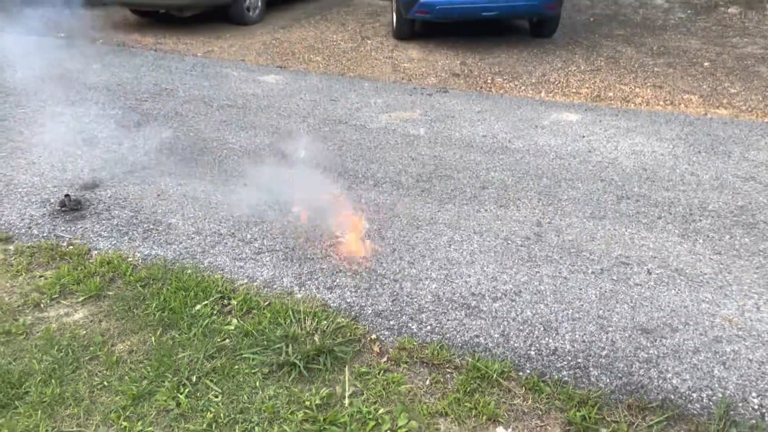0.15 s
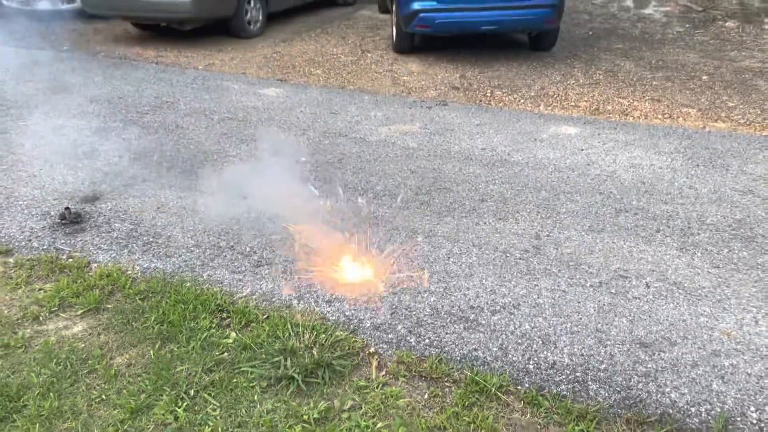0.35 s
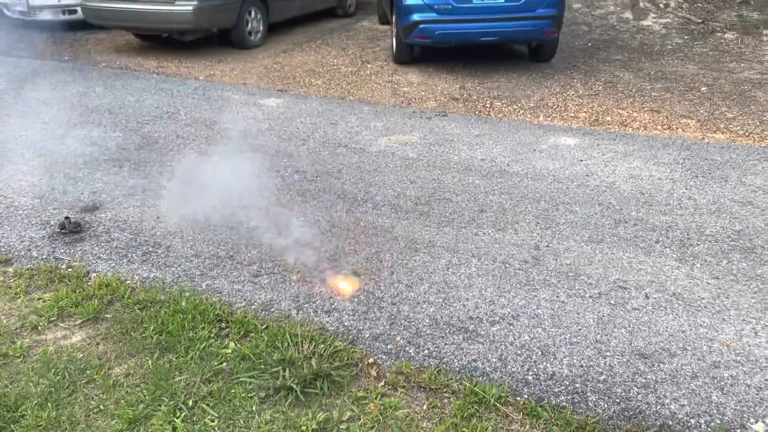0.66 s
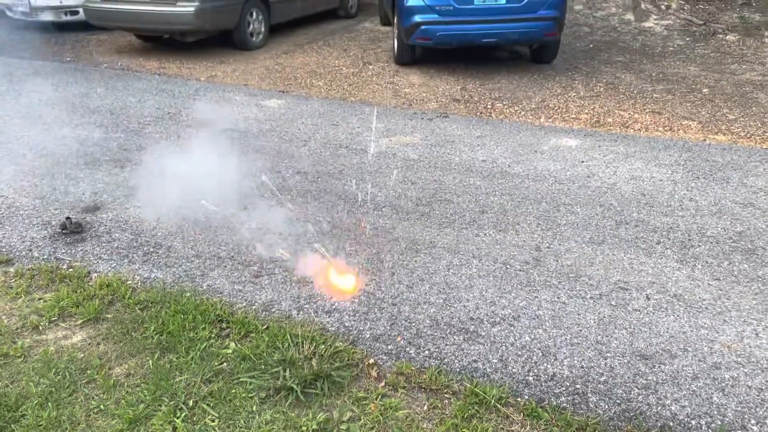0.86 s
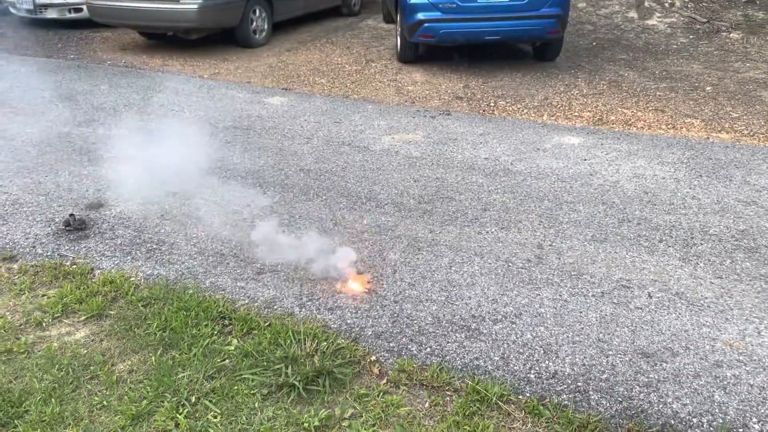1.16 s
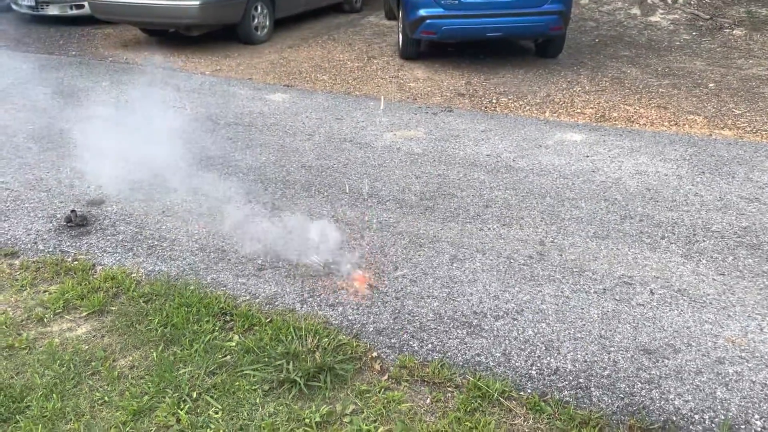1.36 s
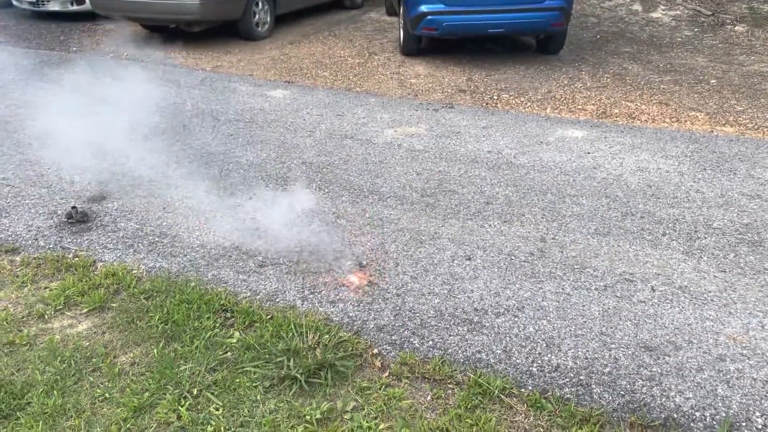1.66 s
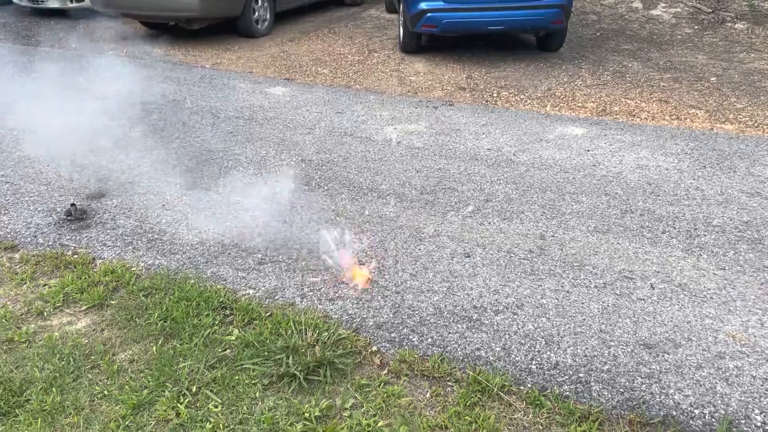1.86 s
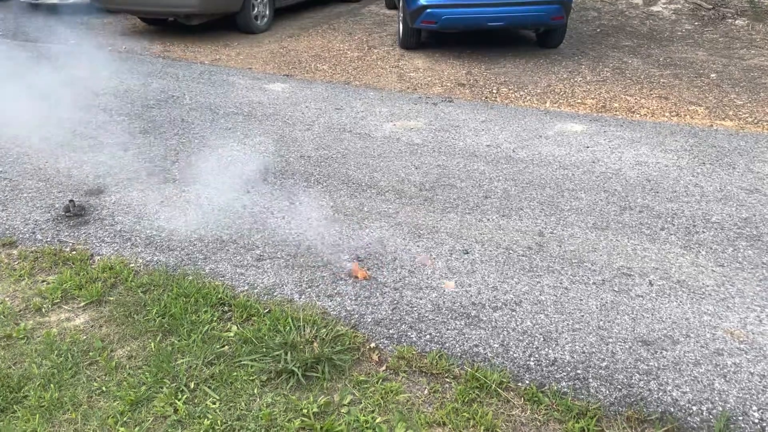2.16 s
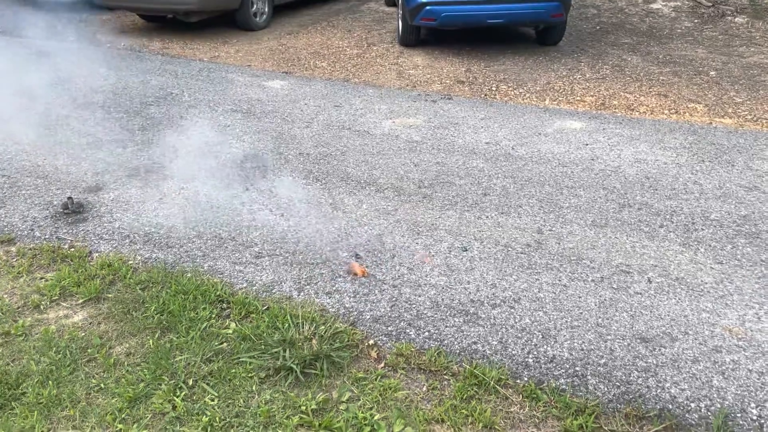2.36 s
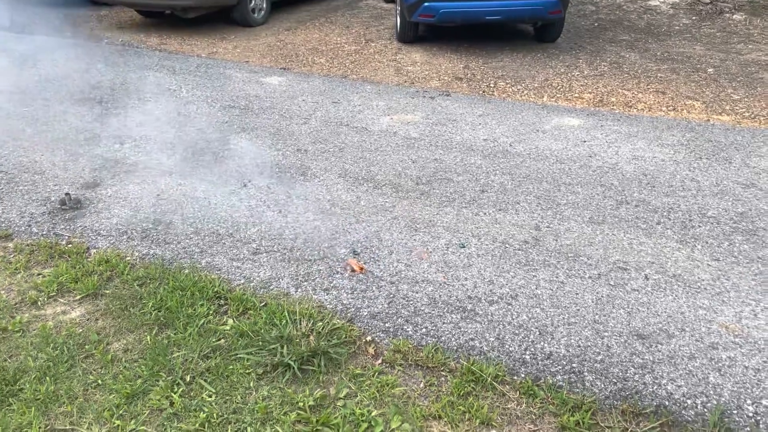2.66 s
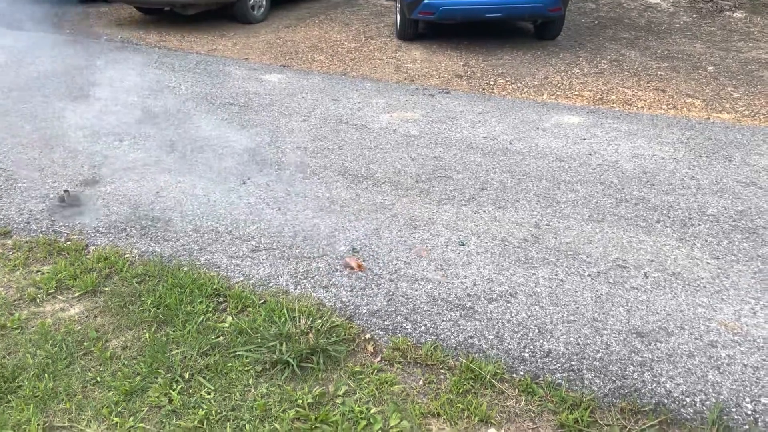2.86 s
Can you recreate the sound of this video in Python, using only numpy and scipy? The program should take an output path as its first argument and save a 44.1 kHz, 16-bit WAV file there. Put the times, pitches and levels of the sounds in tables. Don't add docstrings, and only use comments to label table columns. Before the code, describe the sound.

A small ground firework crackles a few metres away: dense, irregular sharp pops from 0.1 to 0.8 seconds, with gaps around 0.45 and 0.65. Single cracks and pairs follow until 1.9, each with hiss, thump, quick echoes and a soft tree tail. Quiet outdoor wash and faint distant machine hum remain; the hum drops near 2.8, and one last dry pop snaps at 2.9.

```python
import sys
import numpy as np
from scipy import signal
from scipy.fft import rfft, irfft
from scipy.io import wavfile

SR = 44100
rng = np.random.default_rng(int(sys.argv[2]) if len(sys.argv) > 2 else 0)


def elevation(decibels):
    levels = np.asarray(decibels, float)
    return 10 ** (levels / 20)


def generate_wav(signal):
    frames = np.transpose(np.atleast_2d(signal))
    scaled = np.clip(frames, -1, 1) * 32767
    pcm = np.round(scaled).astype(np.int16)
    wavfile.write(sys.argv[1], SR, pcm)


N = 132300
PAD = 8192
LENGTH = N + 2 * PAD
POP_SIZE = 4096

# frequency in Hz, level in dB.
CRACK_TONE = [(150, -20.5), (1000, -9), (2200, -4), (4300, -4), (5600, -7.5), (8500, 0), (12500, -10),
              (15500, -15.5)]
# frequency in Hz, level in dB.
THUMP_TONE = [(25, -4.5), (60, 7), (120, 2.5), (300, -1.5), (520, -4), (750, -12.5), (1200, -42.5),
              (3000, -86)]
ECHO_DELAYS = [.0245, .0435, .0548, .016]


def evened(x):
    return x / np.sqrt(np.mean(x ** 2) + 1e-20)


def read(points, hz):
    f, value = np.transpose(points)
    return np.interp(np.log(hz + 1), np.log(f + 1), value)


def colour(x, table):
    length = x.shape[-1]
    hz = np.fft.rfftfreq(length, 1 / SR)
    return irfft(rfft(x) * elevation(read(table, hz)), length)


def diffuse(length):
    # frequency in Hz, likeness of the two ports from 0 to 1.
    likeness = [(60, .8), (400, .55), (2000, .6), (6000, .8), (8000, .996), (16000, .994)]
    a, b = rfft(rng.standard_normal((2, length)))
    same = np.clip(read(likeness, np.fft.rfftfreq(length, 1 / SR)), 0, 1)
    return irfft(np.array([a, same * a + np.sqrt(1 - same ** 2) * b]), length)


def wander(lowest_hz):
    t = (np.arange(LENGTH) - PAD) / SR
    rates = np.geomspace(lowest_hz, 12 * lowest_hz, 20)
    return evened(sum(np.sin(2 * np.pi * (f * t + rng.random())) / np.sqrt(f) for f in rates))


def outdoor_wash():
    # frequency in Hz, level in dB per Hz.
    air_tone = [(25, -17), (60, -10), (110, -13), (330, -13.5), (1000, -25), (3000, -25.5), (3400, -34),
                (16500, -42)]
    level_db = -65.5 + 1.2 * wander(0.5)
    return elevation(level_db) * evened(colour(diffuse(LENGTH), air_tone))


def machine_hum():
    # frequency in Hz, level in dB.
    partials = [(107.7, -68.5), (215.3, -85), (328.4, -79.5)]
    off_s, fade_s = 2.78, 0.021
    t = (np.arange(LENGTH) - PAD) / SR
    flutter = wander(3)
    turns = np.cumsum(1 + 0.015 * flutter) / SR
    running = 0.11 + 1.9 / (1 + np.exp((t - off_s) / fade_s))
    return running * sum(elevation(db + 0.73 * flutter) * np.sin(2 * np.pi * hz * turns) for hz, db in partials)


def far_wall_boom():
    delay_s, smear_s = 0.14, 0.045
    t = np.arange(SR) / SR
    boom = diffuse(SR) * np.exp(-((t - delay_s) / smear_s) ** 2)
    return boom / np.linalg.norm(boom[0])


def tree_tail():
    # frequency in Hz, time to fall 60 dB in seconds.
    decay = [(50, 0.57), (200, 0.6), (700, 0.33), (2000, 0.96), (5000, 0.84), (10000, 0.63), (15000, 0.78)]
    open_share = 0.3
    hz, frames, z = signal.stft(diffuse(SR), SR, nperseg=512)
    fall = elevation(-60 * frames / read(decay, hz)[:, None])
    tail = signal.istft(z * fall, SR, nperseg=512)[1][:, :SR]
    first = ECHO_DELAYS[0]
    tail *= np.interp(np.arange(SR) / SR, [0, first / 2, first, 2 * first], [0, open_share, open_share, 1])
    return tail / np.linalg.norm(tail[0])


def near_echoes():
    # level in dB, brightness in Hz.
    reflectors = [
        (-4, 5000),
        (-17, 9000),
        (-12, 12000),
        (-19, 9000),
    ]
    smears = [.0025, .002, .0003, .001]
    t = np.arange(SR) / SR
    near = np.zeros((2, SR))
    for delay, smear, (db, top_hz) in zip(ECHO_DELAYS, smears, reflectors):
        puff = diffuse(SR) * (t >= delay) * np.exp(-abs(t - delay) / smear)
        puff = colour(puff, [(top_hz / 8, -14), (top_hz / 2, 0), (top_hz, 0), (top_hz * 2, -12)])
        near += elevation(db) * puff / np.linalg.norm(puff[0])
    return near


def thrown_back(blasts, thumps, dips):
    # frequency in Hz, level in dB.
    tail_tone = [(40, 9), (600, 0), (2000, -1), (5500, -0.5), (8500, 0.5), (11500, -7), (13000, -14),
                 (16000, -14.5)]
    # frequency in Hz, level in dB.
    early_tone = [(60, 4.5), (300, 7.5), (1200, -5.5), (2500, -10.5), (6000, -20), (10000, -15.5),
                  (16000, -33)]
    # frequency in Hz, level in dB.
    boom_tone = [(25, -10), (55, 0), (80, -10), (130, -40)]
    # frequency in Hz, level in dB.
    port_tone = [(11600, 0), (12400, -9), (13500, -9), (14200, 0), (15800, 0), (16300, -25)]
    early_s, early_db = -0.07, -9.5
    early = np.zeros(LENGTH)
    early[PAD + round(early_s * SR)] = 10 * elevation(early_db)

    into_tail = elevation(-8.5) * colour(blasts, tail_tone)
    into_tail += elevation(-5) * colour(thumps, THUMP_TONE)
    into_tail += colour(early, early_tone)
    into_boom = elevation(-3) * colour(thumps, boom_tone)
    back = signal.fftconvolve(colour(blasts, CRACK_TONE)[None], near_echoes(), axes=1)
    back += signal.fftconvolve(into_tail[None], tree_tail(), axes=1)
    back += signal.fftconvolve(into_boom[None], far_wall_boom(), axes=1)

    recover_s = 0.05
    dip_db = signal.lfilter([1], [1, -np.exp(-1 / (recover_s * SR))], dips)
    return colour(back[:, :LENGTH], port_tone) / elevation(np.minimum(dip_db, 25))


def pop(crack_db, blast_db, thump_db):
    # frequency in Hz, level in dB.
    debris_tone = [(300, -14), (800, -14.5), (1250, -0.5), (1600, -13.5), (2200, -1), (5500, -13),
                   (8500, -12.5), (14000, -31)]
    # frequency in Hz, level in dB.
    ahead_tone = [(1500, -6), (6000, -7), (8000, -5.5), (9000, -39.5)]
    bounce_delays = [.0005, .0011, .0023]
    bounce_levels = [-14.5, -19.5, -17.5]
    t = (np.arange(POP_SIZE) - POP_SIZE // 2) / SR
    spike = 1.0 * (t == 0)
    thump = colour(spike, THUMP_TONE)
    direct = colour(spike, CRACK_TONE)
    crack = direct.copy()
    stretch = 1 + rng.random() / 5
    for s, db in zip(bounce_delays, bounce_levels):
        crack += elevation(db) * np.roll(direct, round(s * stretch * SR))

    grow = elevation(np.clip(0.012 * 19.4 * (blast_db + 33), -12, 12))
    rise_s, burst_s = 0.0011 * grow, 0.0023 * grow
    shape = np.where(t < 0, np.exp(-abs(t) / rise_s), np.exp(-(t / burst_s) ** 2))
    common = colour(rng.standard_normal(POP_SIZE), debris_tone)
    apart = colour(rng.standard_normal((2, POP_SIZE)), debris_tone[:4] + [(6000, -33)])
    hiss = evened(common + apart)
    dull = colour(hiss, ahead_tone)
    skirt = elevation(-20) * np.exp(-abs(t) / 0.0045) * evened(dull)
    debris = shape * np.where(t < 0, dull, hiss) + skirt

    ring_hz, ring_s = 1265, 0.0014 * grow
    swell = np.exp(-abs(t) / (ring_s * np.where(t < 0, 1, 0.4)))
    swing = swell * np.cos(2 * np.pi * (ring_hz * t + rng.random((2, 1))))
    swing_db = 3.83 * (blast_db + 16) - 17.5 - 2

    out = elevation(crack_db + 9) * crack / crack.max()
    out = out + elevation(blast_db + 0.5) * debris
    out += elevation(swing_db) * swing
    return out + elevation(thump_db + 7) * thump / thump.max()


def firework():
    # start in seconds, crack in dB, blast in dB, thump in dB.
    dense = [(.0040, -30, -69, -47), (0.1248, -8.5, -14.5, -16.5), (0.1492, -17, -12.5, -39),
             (0.1513, -13.5, -17.5, -7), (0.178, -27, -51, -71), (0.1962, -16.5, -27.5, -60),
             (0.2526, -10, -30.5, -41.5), (0.282, -24, -80, -54), (0.2921, -10.5, -21, -18),
             (0.3152, -6.5, -27.5, -31.5), (0.3322, -8.5, -54, -38), (.3415, -22, -32.5, -49.5),
             (0.3456, -15, -31, -49), (.3760, -4.5, -23.5, -53), (.3790, -10, -31, -41),
             (0.5136, -10.5, -15, -19), (0.5572, -8.5, -23.5, -39), (0.5783, -8, -20.5, -23),
             (0.5919, -8, -20.5, -25.5), (0.6088, -7.5, -28, -52), (0.6169, -8.5, -22.5, -34),
             (0.711, -8, -32, -40.5), (0.726, -9, -26.5, -47), (0.7853, -32.5, -35.5, -46.5)]
    # start in seconds, crack in dB, blast in dB, thump in dB.
    sparse = [(0.8586, -7, -18.5, -18), (0.9619, -4, -20, -46), (1.0218, -8, -30.5, -57),
              (1.0709, -6.5, -18, -29), (1.214, -6.5, -22.5, -44.5), (1.3066, -5.5, -17, -25),
              (1.321, -8.5, -16.5, -20.5), (1.3605, -4.5, -25, -31), (1.4167, -29, -55, -68),
              (1.4194, -19.5, -31.5, -39.5), (1.441, -72, -54, -41.5), (1.5816, -40.5, -50, -50.5),
              (1.6989, -6.5, -16.5, -18), (1.8540, -7, -28, -45), (1.8561, -3, -21.5, -35.5),
              (1.8988, -21.5, -36.5, -53.5), (2.907, -9, -32, -72)]
    echo_cap_db = -17
    dip_per_db, dip_from_db = 1.2, -18
    direct = np.zeros((2, LENGTH))
    blasts, thumps, dips = np.zeros((3, LENGTH))
    for s, crack_db, blast_db, thump_db in dense + sparse:
        at = PAD + round(s * SR)
        direct[:, at - POP_SIZE // 2:at + POP_SIZE // 2] += pop(crack_db, blast_db, thump_db)
        blasts[at] = 10 * elevation(min(blast_db, echo_cap_db))
        thumps[at] = 10 * elevation(thump_db)
        dips[at] = dip_per_db * max(blast_db - dip_from_db, 0)
    return direct + thrown_back(blasts, thumps, dips)


def scene():
    # frequency in Hz, level in dB.
    casing = [(900, 1), (1300, -1), (1500, -1), (2300, 1.5), (3100, -7.5), (4400, 1.5), (5500, -2.5),
              (7000, 3)]
    # frequency in Hz, delay in seconds.
    bass_lag = [(30, .026), (60, .017), (100, .011), (200, .0055), (400, .0035), (800, 0.0013),
                (2000, 0.00027), (5000, 0.0012)]
    # frequency in Hz, radians by which the left port leads.
    port_phase = [(0, -.7), (520, -1.5), (1200, 0), (1460, 2.1), (2600, .6), (5800, 2.0), (7150, 1.2),
                  (17000, 15.3)]
    mix = firework() + outdoor_wash() + machine_hum()
    hz = np.fft.rfftfreq(LENGTH, 1 / SR)
    lag = np.exp(-2j * np.pi * np.cumsum(read(bass_lag, hz)) * hz[1])
    ports = np.exp(-1j * np.array([0 * hz, np.interp(hz, *np.transpose(port_phase))]))
    return irfft(rfft(colour(mix, casing)) * lag * ports, LENGTH)[:, PAD:PAD + N]


def top_cut(x):
    return signal.sosfilt(signal.butter(12, 17150, fs=SR, output="sos"), x)


def record(dry):
    ceiling, edge_hz = 1.05, 16950
    held = ceiling * np.tanh(dry / ceiling)
    low_pass = signal.firwin(511, edge_hz, window=("kaiser", 9), fs=SR)
    held = signal.oaconvolve(held, low_pass[None], "same")
    return top_cut(held)


dry = scene()
out = record(dry)
generate_wav(out)
```